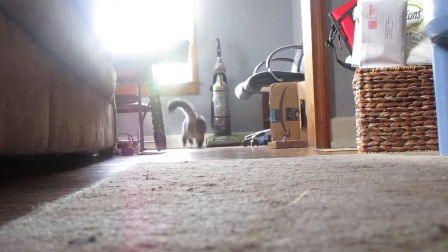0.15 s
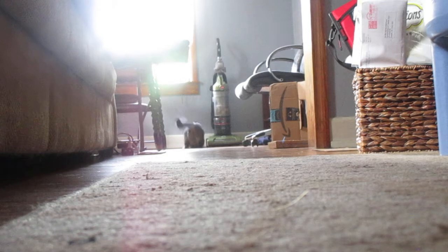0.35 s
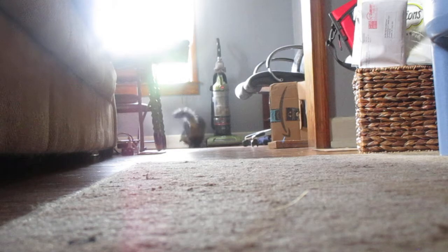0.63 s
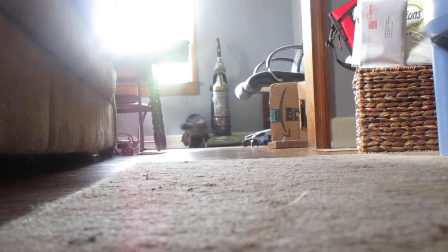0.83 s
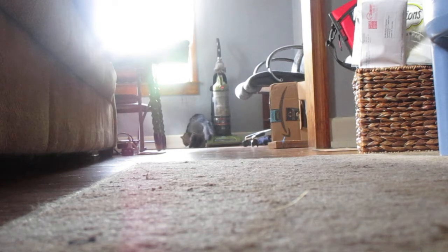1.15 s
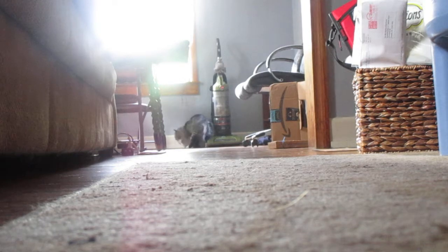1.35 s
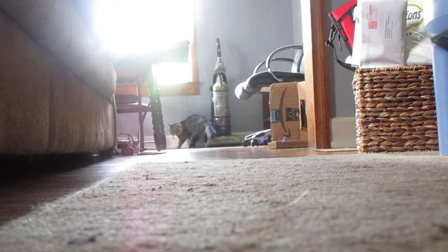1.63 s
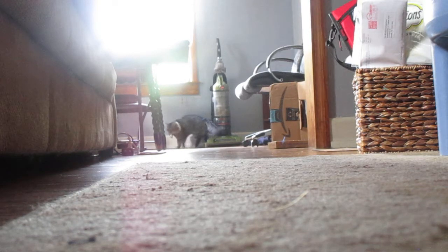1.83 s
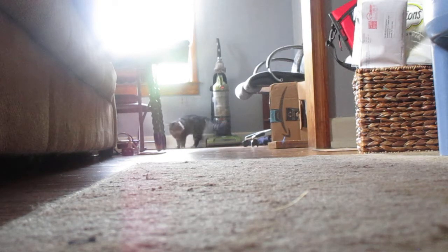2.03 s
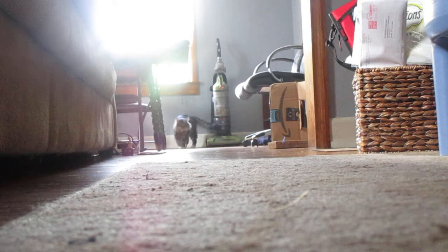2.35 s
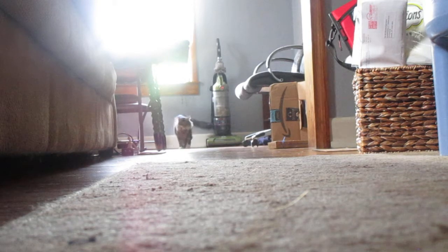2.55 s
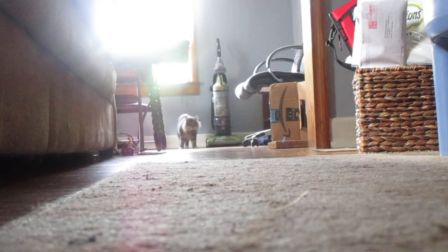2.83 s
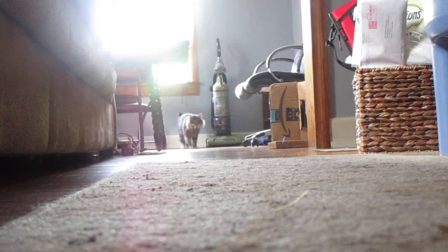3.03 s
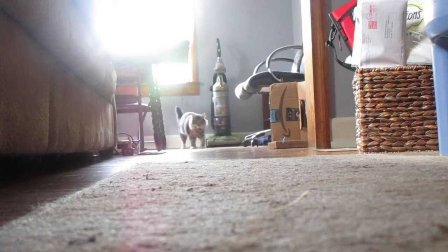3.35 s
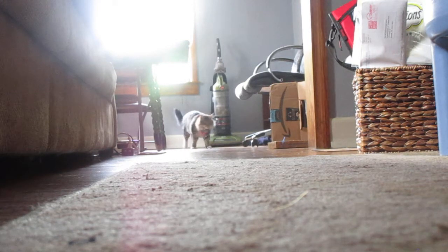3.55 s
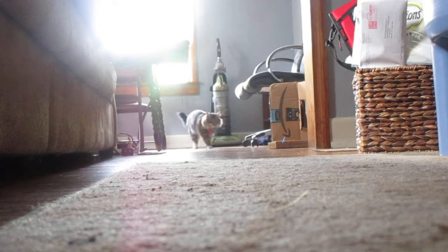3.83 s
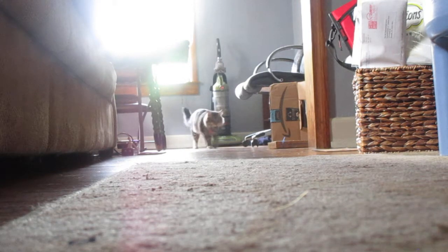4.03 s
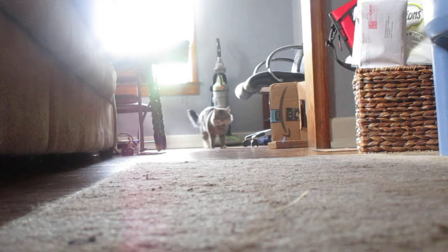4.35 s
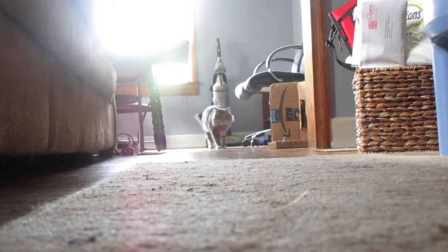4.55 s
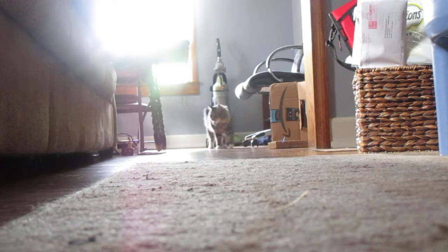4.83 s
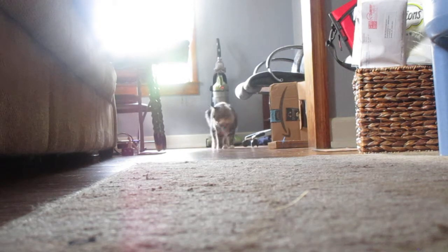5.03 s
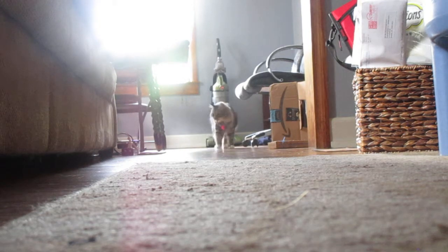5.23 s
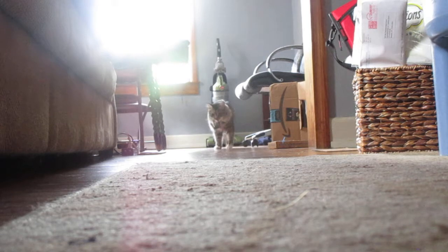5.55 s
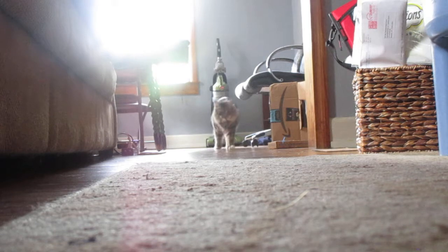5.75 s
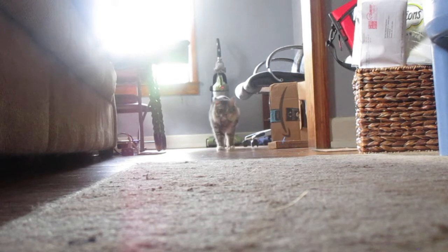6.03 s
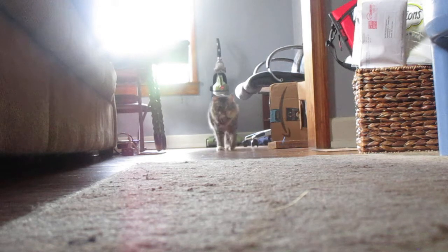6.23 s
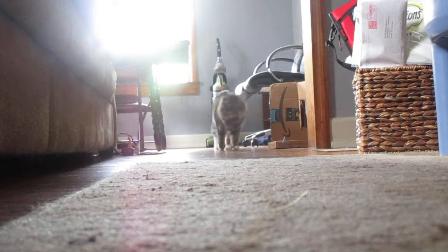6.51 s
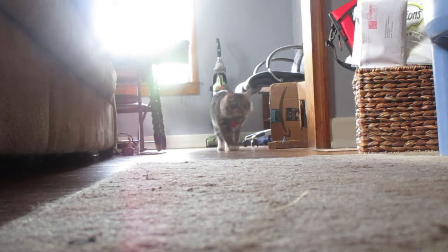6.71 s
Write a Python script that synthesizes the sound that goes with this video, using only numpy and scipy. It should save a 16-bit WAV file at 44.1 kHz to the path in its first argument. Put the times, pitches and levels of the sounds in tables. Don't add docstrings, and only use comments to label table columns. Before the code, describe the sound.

From 0 to 0.6 seconds, a sleeve drags across a rug right beside the microphone: dry swish, rub and fizz, with a sudden pull at 0.2 as a small metal zip tag rattles and clinks. The case rocks with dull low knocks, the strongest double thump near 0.5. Then the handling lifts away into a quiet living room: low, slowly beating motor and mains hum, soft smooth hiss and gently swelling rumble. Cat paws press the floorboards as deep, soft, clawless thuds, one near 0.8, several from 2.5 to 3.6, one at 4.2, then more between 5.2 and 6.5, the last strongest. Faint outdoor bird calls, quick rough falling whistles, come near 0, 1.05, 2, 2.85 and 4.05. Very faint, high insect buzzes pulse about six per second in runs from 0.6 to 6.8. Distant thin peeps come near 6.5.

```python
import sys
import numpy as np
from scipy import signal
from scipy.fft import rfft, irfft
from scipy.io import wavfile

SR = 44100
rng = np.random.default_rng(int(sys.argv[2]) if len(sys.argv) > 2 else 0)


def voltage_ratio(level):
    return 10 ** (np.asarray(level, float) / 20)


def generate_wav(signal):
    frames = np.transpose(np.atleast_2d(signal))
    scaled = np.clip(frames, -1, 1) * 32767
    pcm = np.round(scaled).astype(np.int16)
    wavfile.write(sys.argv[1], SR, pcm)


N = 303408

# pitch_hz, level_db (rms)
BEATING_HUMS = [(120.07, -48), (118.26, -56), (116.76, -56)]
# multiple, level_db (rms)
PUMP_TONES = [(4, -60), (5, -55), (6, -55), (7, -53), (8, -66), (9, -73), (11, -77)]
FAN_TONES = [(2, -56), (3, -55), (4, -61), (8, -62), (10, -65), (14, -64), (20, -71)]
MAINS_TONES = [(3, -64), (4, -56)]
# pitch_hz, level_db (per Hz)
RUMBLE_COLOUR = [(12, -12), (25, 0), (45, -4.5), (90, -5.5), (150, -9), (240, -12), (330, -12.5),
                 (440, -15.5), (520, -23), (680, -25), (780, -38), (1000, -60)]
# time_s, level_db
HOUSE_MOVEMENT = [(0.0, -35), (0.61, -45), (1.24, -49.5), (3.05, -44), (3.95, -52), (4.25, -46),
                  (4.75, -51.5), (5.46, -42), (5.81, -46), (5.98, -42), (6.46, -46), (6.88, -44)]
# pitch_hz, level_db (per Hz)
HISS_COLOUR = [(600, -34), (800, -7.5), (990, -3), (1200, -2.5), (1400, -3.5), (1650, -3.5), (2200, -2),
               (2600, -6), (3000, -11), (4100, -10), (5600, -13.5), (7200, -13.5), (10700, -18.5),
               (13500, -24.5), (16000, -30)]
# pitch_hz, level_db (rms), ring_s (time to fall 60 dB)
DUCT_TONES = [(473.5, -65.5, 0.22), (990, -67, .08), (1371, -69, 0.05)]
# start_s, buzzes (count), gap_s
BUZZ_RUNS = [
    (.625, 3, .19),
    (1.195, 8, .167),
    (2.53, 11, .1814),
    (4.525, 14, .172),
]
# start_s, length_s, pitch_hz, fall_hz, level_db
FAR_PEEPS = [
    (6.49, .03, 9420, 150, -73),
    (6.53, .04, 9340, 0, -72),
    (6.6, .032, 9530, 60, -69),
    (6.635, .03, 9280, 100, -73),
]
# after_s (from its start), length_s, pitch_hz, fall_hz, level_db
CALL_NOTES = [
    (.003, .024, 4020, 60, 0),
    (.029, .027, 3500, 110, 0),
    (.068, .022, 3340, 70, 0),
    (.093, .02, 3120, 150, -10),
]
# start_s, level_db, opening_db (extra on the first note)
BIRD_CALLS = [
    (.023, -57, -11),
    (1.053, -55.5, -0.5),
    (1.966, -59.5, -12),
    (2.84, -60, -9),
    (4.047, -57.5, 7.5),
]
# time_s, peak_db, board_hz
PAW_STEPS = [(0.785, -29, 57), (2.51, -27, 48.7), (2.669, -37, 55), (2.8, -27.5, 47), (3.043, -32, 49),
             (3.261, -31, 52), (3.556, -30, 57), (4.172, -25, 55), (5.253, -28, 66), (5.525, -33, 54),
             (5.746, -27, 44), (5.772, -28.5, 42), (5.89, -34, 50), (6.028, -31.5, 45), (6.319, -33, 49),
             (6.425, -23, 43.4)]
# time_s, board_db, board_hz, shell_db
CASE_KNOCKS = [(.012, -23, 91, -42), (.053, -23, 97, -44), (.085, -28.5, 78, -51), (.2, -29, 98, -47),
               (.223, -40, 99, -38.5), (.275, -22.5, 97, -44), (0.3, -24.5, 118, -41),
               (.321, -25.5, 121, -35), (0.346, -40, 110, -34), (.372, -42, 110, -35),
               (.471, -45, 110, -19), (.494, -16, 109, -22.5), (.517, -20.5, 99, -24),
               (.538, -36, 110, -33), (0.563, -27.5, 119, -34)]
# late_s, level_db, pitch_hz, length (cycles)
SHELL_SWINGS = [(.001, 0, 214, 1.8), (.01, -4.5, 333, 1.53), (.002, -14, 530, 2.6), (0, -24, 780, 0.96)]
# time_s, peak_db, pitch_hz, length (cycles)
HAND_HEAVES = [
    (.04, -29, 28.4, 1.2),
    (.13, -37, 32, 1.3),
    (.31, -34, 28, 1.6),
]
# pitch_hz, level_db (per Hz)
CASE_COLOUR = [(60, 0), (120, 0), (200, 1.5), (350, -7.5), (520, -14.5), (720, -21.5), (900, -57)]
# time_s, level_db
SLEEVE_SPEED = [
    (0, -53.5),
    (.07, -56.5),
    (.178, -62),
    (.196, -42),
    (.23, -43),
    (.3, -38.5),
    (.42, -43),
    (.485, -45),
    (.6, -65),
]
# time_s, rub_db, hold_s
CLOTH_SNAGS = [
    (.04, -55.5, .06),
    (.2, -43, 0.034),
    (.275, -43, 0.052),
    (.445, -42, .012),
    (.47, -46, .015),
]
# pitch_hz, level_db (per Hz)
RUB_COLOUR = [(800, -17), (1150, -12.5), (1600, -12.5), (2500, -3), (3150, -8), (3750, -2), (4400, -3),
              (5200, -26)]
SWISH_COLOUR = [(4200, -11), (5300, -1), (6600, 0), (8500, -3), (9800, -3), (11000, -28)]
FIZZ_COLOUR = [(9000, -25), (10200, -0.5), (12000, -5), (14000, -12), (16000, -11)]
# time_s, rattle_db, hold_s
TAG_JERKS = [
    (.012, -54, .04),
    (.192, -36, .012),
    (.444, -51, .01),
]
# pitch_hz, level_db, ring_s (time to fall 60 dB)
TAG_TONES = [(6950, -4, 0.01), (7200, -3, 0.013), (7440, 2, 0.018), (7600, -2, 0.0068), (7830, -2, .02),
             (8120, 3, 0.012), (8260, -5, .008), (10700, -10, .006), (15100, -7, .003)]
# time_s, level_db
TAG_TOUCHES = [
    (.188, -8),
    (.191, -2),
    (.1935, -3),
    (.197, -6),
]
# pitch_hz, level_db, ring_s (time to fall 60 dB)
CLINK_TONES = [(11640, -41, 0.07), (10600, -40, .03), (15000, -45, .03), (12400, -48, .03)]
# pitch_hz, width_hz, level_db
REFLECTION_NOTCHES = [(4710, 1160, -8), (4680, 310, -5)]

JERK_ATTACK_S = 0.016


def rms_one(x):
    return x / np.sqrt(np.mean(x ** 2) + 1e-20)


def level_in_time(rows):
    time_s, level_db = np.transpose(rows)
    return np.interp(np.arange(N) / SR, time_s, level_db, left=-200, right=-200)


def coloured(x, spectrum):
    hz, level_db = np.transpose(spectrum)
    log_hz = np.log(np.arange(N // 2 + 1) * SR / N + 1)
    gain = voltage_ratio(np.interp(log_hz, np.log(hz), level_db, left=-90, right=-90))
    return rms_one(irfft(rfft(x) * gain, N))


def drift(rate_hz):
    r = np.exp(-80 * np.pi * rate_hz / SR)
    noise = rng.standard_normal(N // 40 + 2002)
    slow = signal.lfilter([1], [1, -2 * r, r * r], noise)[2000:]
    return np.interp(np.arange(N) / 40, np.arange(len(slow)), rms_one(slow))


def ring(clicks, hz, ring_s):
    r = voltage_ratio(-60 / (ring_s * SR))
    w = 2 * np.pi * hz / SR
    return signal.lfilter([0, np.sin(w)], [1, -2 * r * np.cos(w), r * r], clicks + 1e-18)


def grains(per_s, spread_db):
    sizes = voltage_ratio(spread_db * np.minimum(rng.exponential(1, N), 4))
    signs = rng.choice([-1, 1], N)
    return sizes * signs * (rng.random(N) < per_s / SR)


def add(out, start_s, piece):
    i = round(start_s * SR)
    piece = piece[max(-i, 0):N - i]
    out[max(i, 0):max(i, 0) + len(piece)] += piece


def bursts(rows, attack_s, fall_db_per_s):
    t = np.arange(N) / SR
    power = 0
    for s, level_db, hold_s in rows:
        rise = np.clip(1 + (t - s) / attack_s, 0, 1) ** 2
        fall_db = fall_db_per_s * np.maximum(t - s - hold_s, 0)
        power = power + (rise * voltage_ratio(level_db - fall_db)) ** 2
    return np.sqrt(power)


def pushes(rows):
    out = np.zeros(N)
    for s, peak_db, hz, cycles in rows:
        turns = np.arange(-2 * cycles * SR // hz, 4 * cycles * SR // hz) * hz / SR
        width = cycles * np.where(turns < 0, 0.6, 0.8)
        shape = np.exp(-(turns / width) ** 2)
        add(out, s + turns[0] / hz, -voltage_ratio(peak_db) * shape * np.cos(2 * np.pi * turns))
    return out


def motors():
    t = np.arange(N) / SR
    out = np.zeros(N)
    for base_hz, tones in ((59.12, PUMP_TONES), (19.53, FAN_TONES), (60.03, MAINS_TONES)):
        for multiple, level_db in tones:
            out += voltage_ratio(level_db) * np.sin(2 * np.pi * (multiple * base_hz * t + rng.random()))
    in_step_s = 4.07
    for hz, level_db in BEATING_HUMS:
        out += voltage_ratio(level_db) * np.cos(2 * np.pi * hz * (t - in_step_s))
    return np.sqrt(2) * voltage_ratio(0.35) * out


def room_tone():
    rumble = voltage_ratio(-43 + 0.71 * drift(3.3)) * coloured(rng.standard_normal(N), RUMBLE_COLOUR)
    lowest = signal.sosfilt(signal.butter(2, 80, fs=SR, output="sos"), rumble)
    swell_db = level_in_time(HOUSE_MOVEMENT)
    swell = voltage_ratio(0.83 * (swell_db - np.median(swell_db)))
    out = rumble + (swell - 1) * lowest
    for hz, level_db, ring_s in DUCT_TONES:
        out += voltage_ratio(level_db) * rms_one(ring(rng.standard_normal(N), hz, ring_s))
    hiss = coloured(rng.standard_normal(N), HISS_COLOUR)
    return out + voltage_ratio(-54 + 0.27 * drift(2.9)) * hiss


def insect():
    gate = np.zeros(N)
    shape = np.hanning(round(0.085 * SR)) ** 0.6
    for first_s, buzzes, gap_s in BUZZ_RUNS:
        for k, chance in enumerate(rng.standard_normal(buzzes)):
            level_db = -72.5 + 2.2 + 0.8 * chance
            add(gate, first_s + k * gap_s - 0.042, voltage_ratio(level_db) * shape)
    wing_hz, ring_s = 10460, 0.009
    buzz = ring(ring(grains(3000, 1.5), wing_hz, ring_s), wing_hz, ring_s)
    return gate * rms_one(buzz)


def whistle(length_s, start_hz, end_hz, wobble_hz):
    part = np.linspace(0, 1, round(length_s * SR))
    count = round(length_s * 300)
    tremble = np.interp(part, np.linspace(0, 1, count), rng.standard_normal(count))
    pitch_hz = start_hz + (end_hz - start_hz) * part + wobble_hz * tremble
    return np.sin(np.pi * part) ** 0.7 * np.sin(2 * np.pi * np.cumsum(pitch_hz) / SR)


def bird_note(length_s, hz, fall_hz, level_db):
    return voltage_ratio(level_db + 3) * whistle(length_s, hz + fall_hz / 2, hz - fall_hz / 2, wobble_hz=55)


def birds():
    out = np.zeros(N)
    for s, call_db, opening_db in BIRD_CALLS:
        add(out, s - 0.005, voltage_ratio(call_db - 4.5) * whistle(0.125, 4050, 2900, wobble_hz=200))
        for after_s, length_s, hz, fall_hz, note_db in CALL_NOTES:
            level_db = call_db + note_db + opening_db * (hz == CALL_NOTES[0][2])
            add(out, s + after_s, bird_note(length_s, hz, fall_hz, level_db))
    for s, length_s, hz, fall_hz, level_db in FAR_PEEPS:
        add(out, s, bird_note(length_s, hz, fall_hz, level_db))
    lag_s = np.arange(SR // 8) / SR
    echoes = rng.standard_normal(len(lag_s)) * voltage_ratio(-60 * lag_s / 0.12)
    echoes = echoes / np.linalg.norm(echoes)
    return out + voltage_ratio(-9) * signal.fftconvolve(out, echoes)[:N]


def paws():
    return pushes([(s, peak_db - 2.0, hz, 0.7) for s, peak_db, hz in PAW_STEPS])


def rocking():
    swings = []
    for s, board_db, board_hz, shell_db in CASE_KNOCKS:
        swings.append((s, board_db, board_hz, 1.28))
        for late_s, level_db, hz, cycles in SHELL_SWINGS:
            chance = rng.standard_normal()
            swings.append((s + late_s, shell_db + level_db + chance, hz * (1 + 0.05 * chance), cycles))
    return pushes(swings) + pushes(HAND_HEAVES)


def case_rumble():
    contacts = [(s, max(board_db, shell_db) - 11.5, 0) for s, board_db, _, shell_db in CASE_KNOCKS]
    shudder = bursts(contacts, attack_s=0.0066, fall_db_per_s=298)
    friction = voltage_ratio(level_in_time(SLEEVE_SPEED) - 3)
    lumps = voltage_ratio(1.6 * drift(25))
    return np.hypot(shudder, friction) * lumps * coloured(grains(600, 2.5), CASE_COLOUR)


def zip_tag():
    swish = voltage_ratio(level_in_time(SLEEVE_SPEED))
    shaking = np.hypot(voltage_ratio(-22) * swish, bursts(TAG_JERKS, JERK_ATTACK_S, fall_db_per_s=250))
    rattle = np.zeros(N)
    for hz, level_db, ring_s in TAG_TONES:
        rattle += voltage_ratio(level_db) * ring(grains(1500, 2.3), hz, ring_s)
    out = shaking * rms_one(rattle)
    strike = np.zeros(N)
    for s, level_db in TAG_TOUCHES:
        strike[round(s * SR)] = voltage_ratio(level_db)
    for hz, level_db, ring_s in CLINK_TONES:
        out += voltage_ratio(level_db) * ring(strike, hz, ring_s)
    return out


def sleeve():
    swish = voltage_ratio(level_in_time(SLEEVE_SPEED))
    rub = np.hypot(voltage_ratio(-4) * swish, bursts(CLOTH_SNAGS, attack_s=0.011, fall_db_per_s=245))
    crackle = voltage_ratio(-6) * bursts(TAG_JERKS, JERK_ATTACK_S, fall_db_per_s=450)
    fizz = np.hypot(voltage_ratio(-8.5) * swish, crackle)
    stroke = drift(60)
    out = rub * coloured(grains(6000, 2.5), RUB_COLOUR) * voltage_ratio(0.8 * stroke + 0.8 * drift(60))
    out += swish * coloured(grains(10000, 1.1), SWISH_COLOUR) * voltage_ratio(0.81 * stroke + 0.6 * drift(60))
    out += fizz * coloured(grains(12000, 2.5), FIZZ_COLOUR) * voltage_ratio(0.74 * stroke)
    return out


def scene():
    background = motors() + room_tone() + insect() + birds()
    handling = rocking() + case_rumble() + zip_tag() + sleeve()
    return (background + paws() + handling)[None]


def low_pass(x):
    return signal.sosfilt(signal.butter(12, 16410, fs=SR, output="sos"), x)


def record(dry):
    for hz, width_hz, cut_db in REFLECTION_NOTCHES:
        w = 2 * np.pi * hz / SR
        depth = voltage_ratio(cut_db / 2)
        width = np.sin(w) * width_hz / hz / 2
        b = [1 + width * depth, -2 * np.cos(w), 1 - width * depth]
        a = [1 + width / depth, -2 * np.cos(w), 1 - width / depth]
        dry = signal.lfilter(b, a, dry)
    top_cut = signal.ellip(12, 0.5, 80, 15740, fs=SR, output="sos")
    mix = signal.sosfilt(top_cut, dry)
    return low_pass(mix)


dry = scene()
out = record(dry)
generate_wav(out)
```